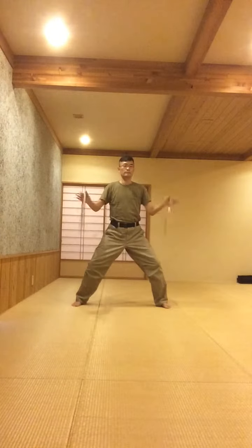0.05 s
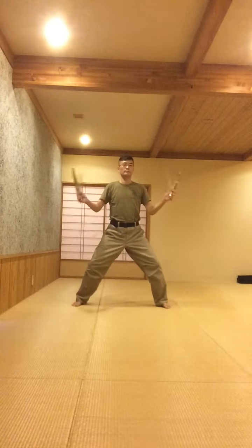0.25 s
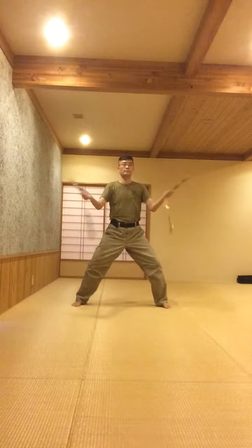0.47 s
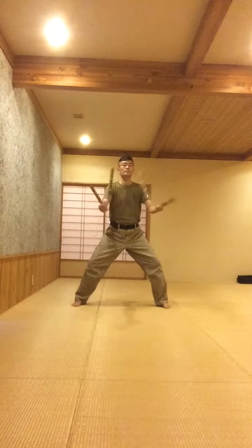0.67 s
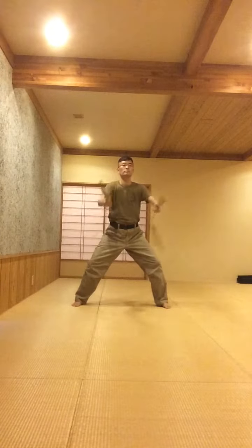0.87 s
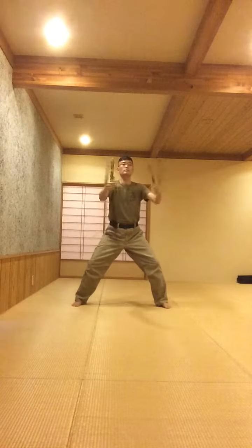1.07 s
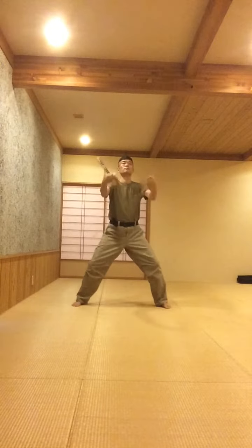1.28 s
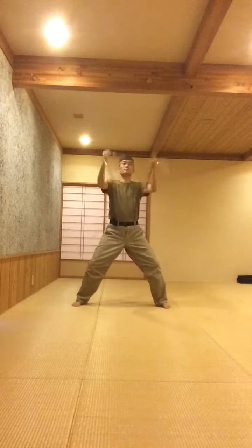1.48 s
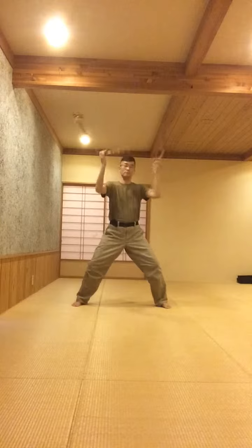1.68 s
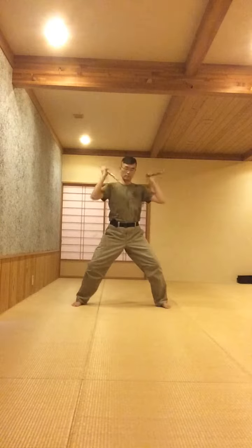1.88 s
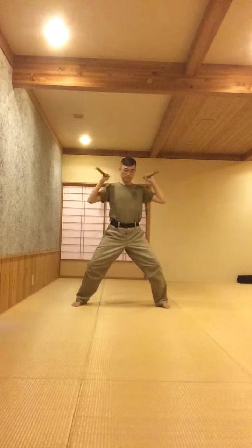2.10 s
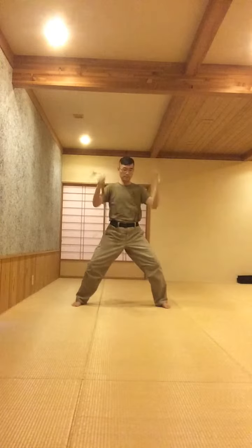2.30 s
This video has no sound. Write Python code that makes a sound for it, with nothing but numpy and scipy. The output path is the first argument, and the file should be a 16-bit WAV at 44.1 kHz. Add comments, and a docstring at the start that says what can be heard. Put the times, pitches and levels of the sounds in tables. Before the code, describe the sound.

Wooden nunchaku clack as they spin a few metres away in a quiet hall. The loudest, sharpest clack comes at 0.2 seconds, and a lighter one at 0.75. Light chain rattles and faint swishes lead to a quick cluster of knocks and rattles from 1.25 to 1.45. Tiny swivel squeaks follow around 1.5 and after a soft knock at 2 seconds. Hits echo briefly over a low room rumble.

```python
"""In a quiet, wood-lined practice hall, two wooden nunchaku are spun a few metres away.
Impacts excite the bending modes of the sticks, which clash, knock and slap against the body.
Chain links collide in rattles, friction makes the swivels squeak, and the swings stir the air.
Floor and walls reflect each blow, and its reverberation dies away over a low, steady room rumble."""
import sys
import numpy as np
from scipy import signal
from scipy.fft import rfft, irfft
from scipy.io import wavfile
from scipy.ndimage import uniform_filter1d

SR = 44100
rng = np.random.default_rng(int(sys.argv[2]) if len(sys.argv) > 2 else 0)


def unload_audio(sound):
    """Save the sound as a 16-bit wav file, at the path given as the first command line argument."""
    columns = np.transpose(np.atleast_2d(sound))
    # keep every value between -1 and 1, then stretch to whole-number steps
    steps = np.round(np.clip(columns, -1, 1) * 32767)
    wavfile.write(sys.argv[1], SR, steps.astype(np.int16))


N = 108045
T = np.arange(N) / SR
TILT_FROM_HZ = 1000  # spectral tilts act above this frequency

PARTNER_PITCH_RATIO, PARTNER_DB = 1.025, -2.5  # the second stick is tuned slightly higher
# Bending modes of a stick: freq_hz, relative_level_db, t60_s
BENDING_MODES = [(541, -23.5, .05), (1528, -9, 0.093), (2858, 0, 0.031), (3428, -8, .02),
                 (4387, 4.5, 0.022), (6140, 3.5, 0.025), (7710, 3.5, 0.018), (9520, -7.5, 0.015),
                 (10900, -12, .01)]
# Rank of each mode above: bending_order
BENDING_ORDERS = [1, 2, 3, 3, 4, 5, 6, 7, 8]


def stick_ring(t, point, tilt_db, pitch_ratio):
    """Modal vibration of two free bars: a mode is excited as much as it moves at the contact point."""
    ring = 0
    for order, (hz, db, t60) in zip(BENDING_ORDERS, BENDING_MODES):
        shape = np.cos(np.pi * ((order + .5) * point + .25))
        gain = undb(db + tilt_db * np.log2(max(hz, TILT_FROM_HZ)))
        phase = 2 * np.pi * hz * pitch_ratio * t
        partner = undb(PARTNER_DB) * np.sin(phase * PARTNER_PITCH_RATIO + 2 * np.pi * rng.random())
        ring = ring + shape * gain * (np.sin(phase) + partner) * np.exp(-np.log(1000) * t / t60)
    return level(ring, 0)


# Spectrum of the crack of wood on wood: freq_hz, relative_level_db
CRACK_SPECTRUM = [(100, -31), (230, -33), (340, -14.5), (520, -18), (850, -6.5), (1150, -14.5), (1500, 1.5),
                  (1850, -3.5), (2150, -1), (2550, 0.5), (2800, 4), (3100, -6), (3380, 1), (3900, -8),
                  (4250, -3), (5000, -9), (5900, -11), (6800, -15.5), (7700, -9.5), (8600, -24.5),
                  (11000, -21.5), (14000, -17.5), (16000, -30)]
# Hard blows of stick on stick: start_s, level_db, tilt_db_per_octave, crack_decay_s, ring_db, room_db
STICK_CLASHES = [(0.2064, -18, 0.4, 0.0028, -7, 2.5), (0.2147, -28, 2.8, 0.0012, -5, -5),
                 (1.3163, -36, -1, 0.0083, -15, 2), (1.3965, -40.5, 0.6, 0.0076, -8.5, 4.5)]


def clashes(bus, t):
    """Hard impact: a broadband crack dominates, while the blow near the tip rings the low modes."""
    rise = contact_rise(t)
    for start, db, tilt_db, decay_s, ring_db, room_db in STICK_CLASHES:
        crack = level(colour(rise * burst(t, decay_s), CRACK_SPECTRUM, tilt_db), 0)
        ring = undb(ring_db) * rise * stick_ring(t, point=.02, tilt_db=-8, pitch_ratio=0.97)
        add(bus, start, level(crack + ring, db), room_db)


# Knocks on a stick: start_s, level_db, point_along_stick_fraction, tilt_db_per_octave,
# pitch_ratio, crack_db, room_db
STICK_KNOCKS = [(.007, -51, 0.17, -2.5, 0.98, -10, 4.5), (0.0185, -43.5, 0.49, -7, 0.93, -3, -3),
                (.195, -50, 0.38, -7.5, 0.99, -2, 18), (0.2023, -34.5, 0.4, -6, .92, -15, -12.5),
                (.7587, -34, 0, 2, 0.97, -2.5, -.5), (.7613, -29.5, 0.62, 1.4, 0.99, -7, -5),
                (1.2615, -49.5, 0.49, -5, 0.91, 0, 3.5), (1.343, -41, 0.44, -6.5, 0.95, -3, 2.5),
                (1.421, -43, 0.12, 4.5, 1.0, -0.5, -1.5), (1.9749, -41, 0.47, -2, 0.96, -8, -5.5),
                (1.9808, -42.5, .48, -2.5, 0.97, -2, -5.5)]


def knocks(bus, t):
    """Free vibration after impact: the bending modes carry most of the sound, with a brief crack."""
    for start, db, point, tilt_db, pitch_ratio, crack_db, room_db in STICK_KNOCKS:
        crack_tilt_db = 0.91 * tilt_db - 0.5  # a softer knock also cracks more dully
        crack = level(colour(burst(t, decay_s=0.0036), LINK_SPECTRUM, crack_tilt_db), crack_db)
        ring = stick_ring(t, point, tilt_db, pitch_ratio)
        add(bus, start, level(contact_rise(t) * (crack + ring), db), room_db)


# Catches of a stick against the body: start_s, level_db, centre_hz
BODY_SLAPS = [(.214, -43, 502), (1.3138, -41.5, 810)]


def slaps(bus, t, width_hz=425):
    """Damped impact: a stick caught against the body gives a dull band of noise and no ring."""
    for start, db, hz in BODY_SLAPS:
        band = signal.butter(3, [hz - width_hz / 2, hz + width_hz / 2], "band", fs=SR, output="sos")
        slap = signal.sosfilt(band, burst(t, decay_s=0.0041))
        add(bus, start, level(slap, db), room_db=3)


# Spectrum of chain links, also used for the crack of a knock: freq_hz, relative_level_db
LINK_SPECTRUM = [(200, -16), (800, -22.5), (1500, -3), (2050, -10.5), (2800, 1), (4500, -3.5), (6200, -3),
                 (7700, -8), (8600, -18), (9800, -12), (16000, -19.5)]
# Showers of link clicks: start_s, length_s, level_db, tilt_db_per_octave, room_db
CHAIN_RATTLES = [(0.137, 0.019, -44, -5.5, -1.5), (0.596, 0.0055, -54.5, 0.5, 1),
                 (0.729, 0.057, -51.5, -4.5, 1), (0.913, 0.1, -50, -5, 0), (0.952, 0.007, -54.5, 3, 5),
                 (1.109, 0.0063, -55, -1.5, -1.5), (1.254, 0.017, -48, -2, -3),
                 (1.268, 0.033, -51.5, -2, 4), (1.314, 0.011, -40.5, 0.5, -0.5),
                 (1.385, 0.035, -36, -1, -11), (1.532, 0.11, -46.5, 0, -4), (1.781, .009, -57, -4.5, -4.5),
                 (1.906, 0.0081, -60, -4, 2), (2.1, 0.12, -55, -6.5, -14)]


def rattles(bus, t, clicks_per_s=2200, scatter_db=4):
    """Shot noise: tumbling links collide at random instants, each click with its own strength."""
    for start, length, db, tilt_db, room_db in CHAIN_RATTLES:
        collisions = rng.random(len(t)) < clicks_per_s / SR
        strength = undb(scatter_db * rng.standard_normal(len(t)))
        clicks = collisions * strength * rng.choice([-1, 1], len(t))
        rattle = colour(clicks * swell(t, length), LINK_SPECTRUM, tilt_db)
        add(bus, start, level(rattle, db), room_db)


# Squeaks of the chain swivels: start_s, length_s, from_hz, to_hz, level_db
SWIVEL_SQUEAKS = [(0.96, 0.015, 6800, 6800, -50), (1.491, 0.0403, 7260, 6470, -48),
                  (1.529, 0.033, 5700, 5010, -51.5), (1.556, 0.016, 2675, 2850, -55),
                  (2.067, 0.019, 7060, 7270, -50), (2.17, 0.093, 2780, 2614, -59.5)]


def squeaks(bus, t, roughness=0.027):
    """Friction-driven oscillation: a swivel gives a gliding tone, roughened by frequency jitter."""
    for start, length, from_hz, to_hz, db in SWIVEL_SQUEAKS:
        jitter = uniform_filter1d(rng.standard_normal(len(t)), size=30)
        hz = np.interp(t, [0, length], [from_hz, to_hz]) * (1 + roughness * jitter / jitter.std())
        tone = np.sin(2 * np.pi * np.cumsum(hz) / SR)
        add(bus, start, level(swell(t, length) * tone, db), room_db=-3)


# Swings of a stick through the air: peak_s, half_length_s, level_db
AIR_SWISHES = [(0.853, .08, -64), (1.197, 0.17, -57.5)]


def swishes(band_hz=(40, 490)):
    """Aerodynamic noise: a soft puff of air swells and fades with the speed of each swing."""
    band = signal.butter(2, band_hz, "band", fs=SR, output="sos")
    air = signal.sosfilt(band, rng.standard_normal(N))
    envelope = sum(undb(db) * np.exp(-((T - peak) / half) ** 2) for peak, half, db in AIR_SWISHES)
    return air / air.std() * envelope


# Early reflections from floor and walls: delay_s, gain
REFLECTIONS = [(.0029, 0.34), (.0098, 0.33), (0.0229, .18), (.029, 0.22)]
# Reverberation time of the hall: freq_hz, t60_s
REVERB_TIMES = [(300, .42), (520, 0.59), (800, 0.45), (1550, .44), (3000, 0.42), (6000, 0.35), (9000, 0.4),
                (15000, 0.33)]


def hall(direct, send, onset_s=0.003, build_s=.006):
    """Reverberation: a few distinct reflections and a diffuse tail whose treble is absorbed first."""
    size = 256
    hz, t, cells = signal.stft(rng.standard_normal(SR // 2), SR, nperseg=size)
    t60 = at(REVERB_TIMES, np.maximum(hz, 1))[:, None]
    tail = signal.istft(cells * np.exp(-np.log(1000) * t / t60), SR, nperseg=size)[1]
    tail *= np.clip((T[:len(tail)] - onset_s) / build_s, 0, 1)
    response = tail / np.sqrt(np.sum(tail ** 2))
    for delay, gain in REFLECTIONS:
        scatter = burst(T[:size], decay_s=0.0006)
        i = int(delay * SR)
        response[i:i + size] += gain * scatter / np.sqrt(np.sum(scatter ** 2))
    return direct + signal.fftconvolve(send, response)[:N]


# Spectrum of the room's background noise: freq_hz, relative_level_db
RUMBLE_SPECTRUM = [(20, -12), (30, -25.5), (43, -2.5), (58, -3.5), (80, -2), (110, -5.5), (160, 0.5),
                   (205, 6), (250, -4.5), (370, 2.5), (520, -8.5), (800, -11), (1500, -16), (2800, -20.5),
                   (5000, -27.5), (7500, -31.5), (9000, -36), (16000, -34.5)]


def rumble(level_db=-54, waver_db=1.95):
    """Ambient noise floor: a low rumble with a faint hiss, wavering slightly in level."""
    hz = np.maximum(np.arange(N + 1) * SR / (2 * N), 1)
    noise = irfft(rfft(rng.standard_normal(2 * N)) * undb(at(RUMBLE_SPECTRUM, hz)))[:N]
    waver = np.interp(T, np.linspace(0, T[-1], 20), rng.standard_normal(20))
    return noise / noise.std() * undb(level_db + waver_db * waver)


def burst(t, decay_s):
    """Contact noise: a fast-dying burst of tiny impacts, even across the spectrum."""
    envelope = np.exp(-t / decay_s)
    noise = rng.standard_normal(len(t)) * envelope
    whitened = irfft(np.exp(1j * np.angle(rfft(noise))), len(t))
    return whitened * np.sqrt(envelope)


def contact_rise(t, contact_s=0.00058):
    """Finite contact time: a blow builds up quickly but not at once."""
    return 1 - np.exp(-t / contact_s)


def swell(t, length):
    """Half-sine envelope: a rounded rise and fall."""
    return np.sin(np.pi * np.minimum(t / length, 1))


def colour(x, spectrum, tilt_db):
    """Minimum-phase filtering: impose a spectrum and an extra tilt per octave."""
    size = 2048
    hz = np.maximum(np.arange(size // 2 + 1) * SR / size, SR / size)
    gain = undb(at(spectrum, hz) + tilt_db * np.log2(np.maximum(hz, TILT_FROM_HZ)))
    cepstrum = irfft(np.log(gain))
    cepstrum[1:size // 2] *= 2  # folding onto positive time makes the filter causal
    cepstrum[size // 2 + 1:] = 0
    return signal.oaconvolve(x, irfft(np.exp(rfft(cepstrum))))[:len(x)]


def at(points, hz):
    """Interpolate (freq_hz, value) points on a log-frequency axis."""
    freqs, values = np.array(points).T
    return np.interp(np.log(hz), np.log(freqs), values)


def undb(db):
    """Decibels to amplitude gain."""
    return 10 ** (np.asarray(db) / 20)


def level(x, db):
    """Energy normalisation: give a short sound the energy of 10 ms at this level."""
    return x * undb(db) * np.sqrt(.01 * SR / np.sum(x ** 2))


def add(bus, start, x, room_db):
    """Superposition: place a sound on the direct path and send it to the room."""
    i = int(start * SR)
    x = x[:N - i]
    bus[:, i:i + len(x)] += np.outer([1, undb(room_db)], x)


def scene():
    """Sticks and chains excite the hall; swishes and rumble add to their sound."""
    bus = np.zeros((2, N))  # direct path, room send
    t = T[:6144]  # time axis of one short event
    for source in (clashes, knocks, slaps, rattles, squeaks):
        source(bus, t)
    return (hall(*bus) + swishes() + rumble())[None]


def record(dry, cutoff_hz=15750):
    """Band limiting: a steep low-pass filter removes the highest treble."""
    return signal.sosfilt(signal.ellip(10, .2, 70, cutoff_hz, fs=SR, output="sos"), dry)


dry = scene()
out = record(dry)
unload_audio(out)
```